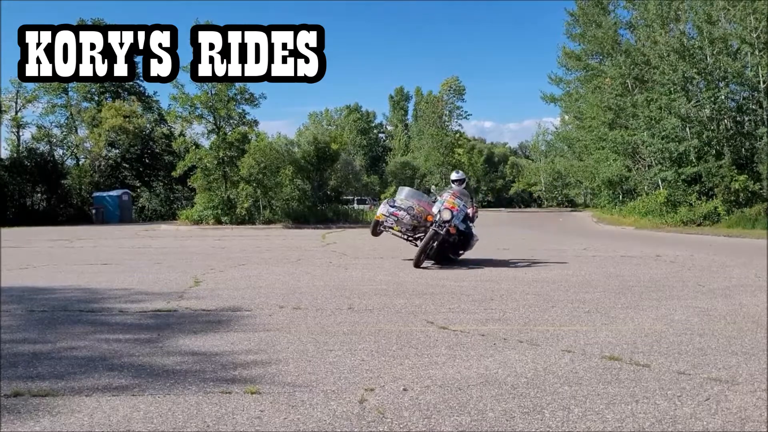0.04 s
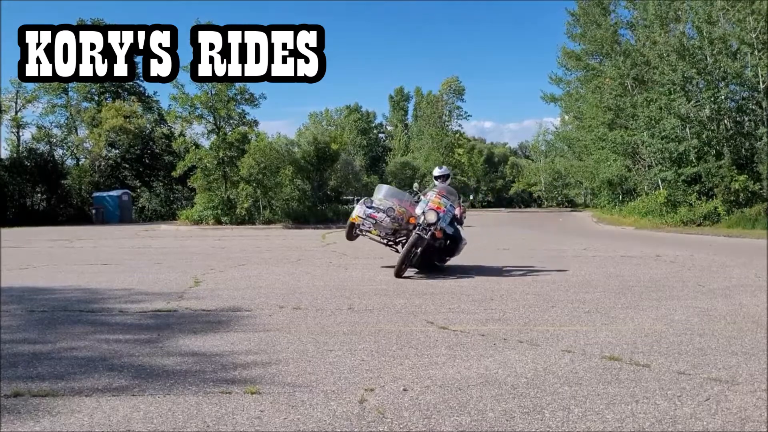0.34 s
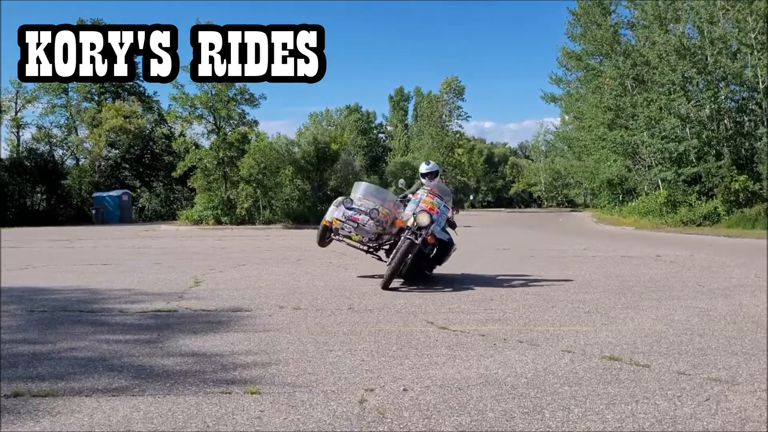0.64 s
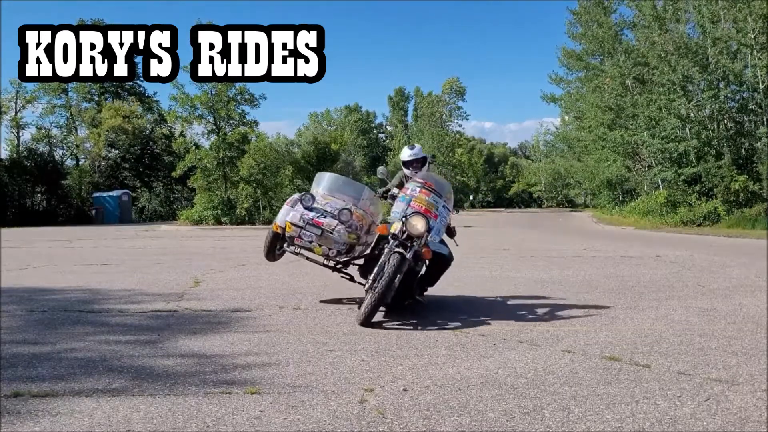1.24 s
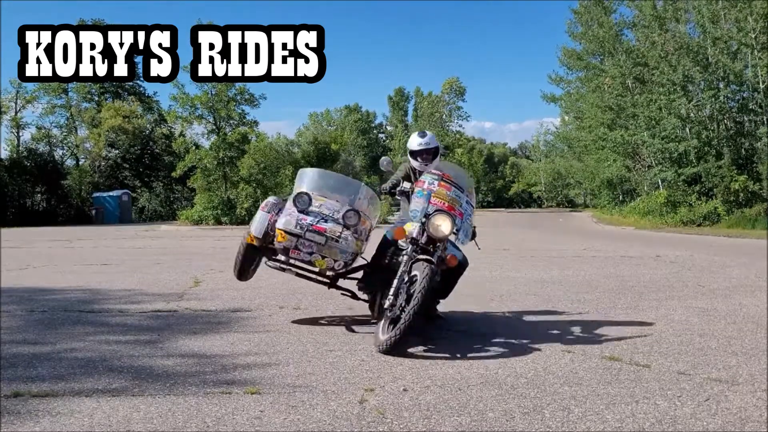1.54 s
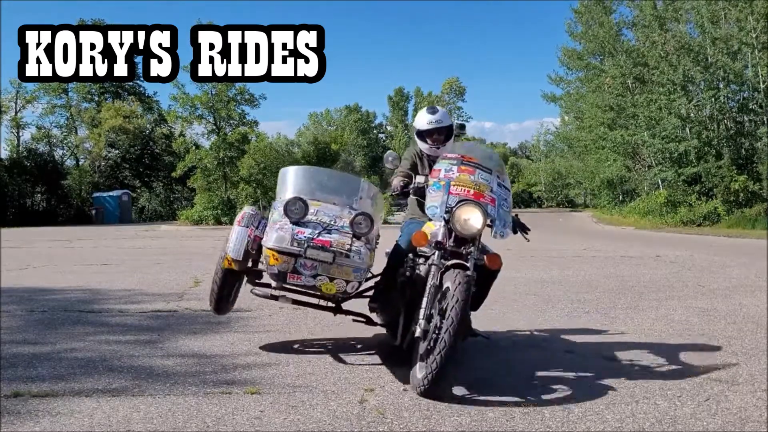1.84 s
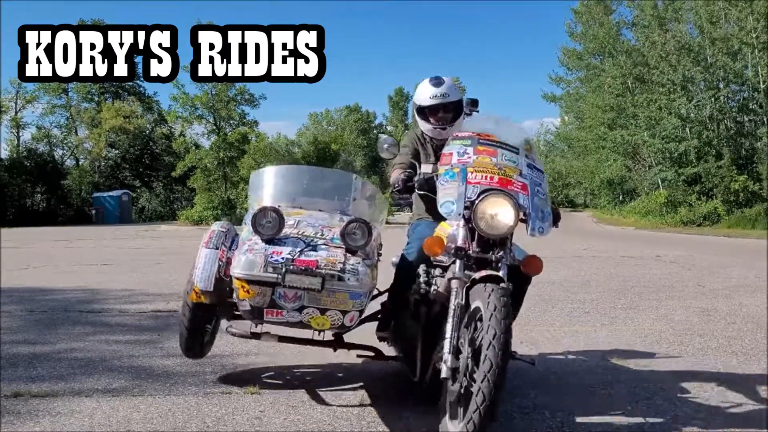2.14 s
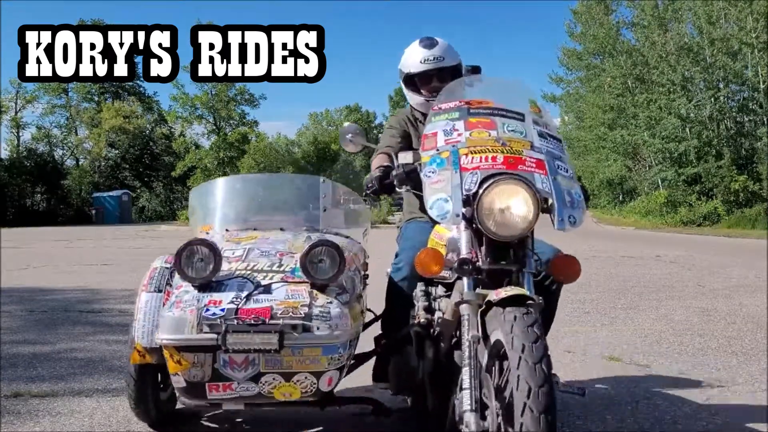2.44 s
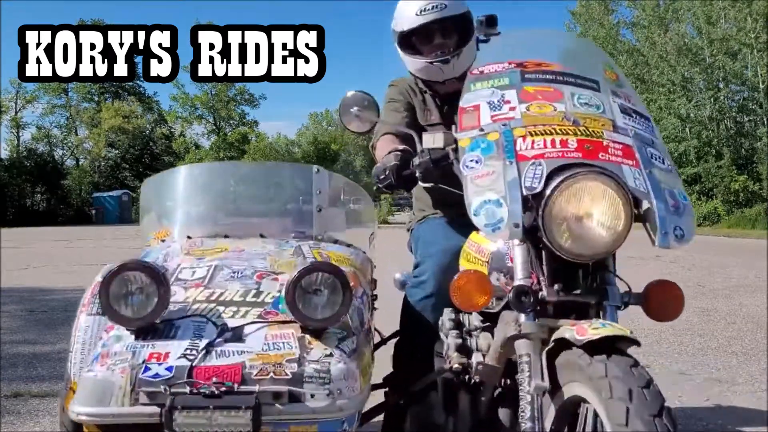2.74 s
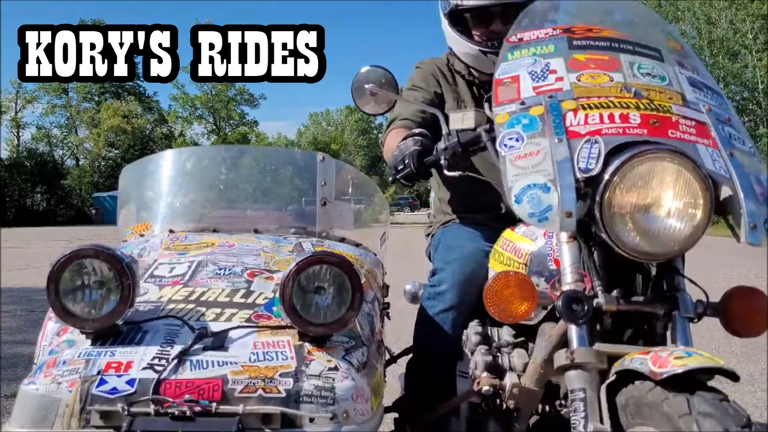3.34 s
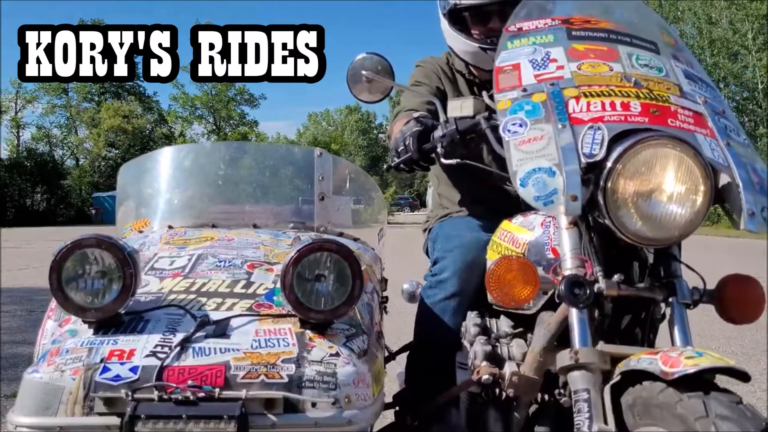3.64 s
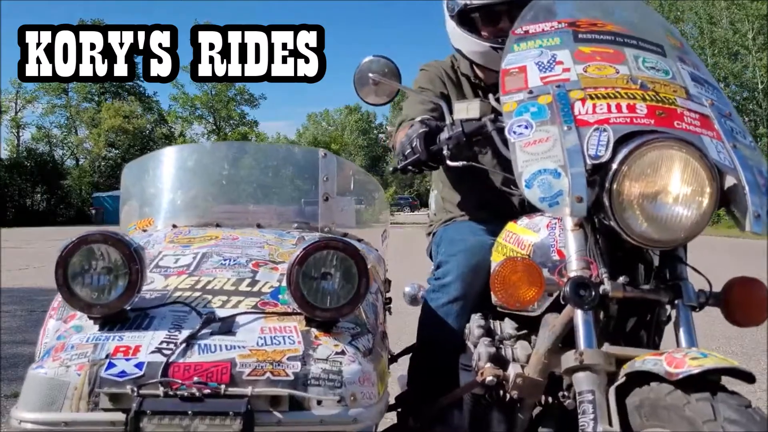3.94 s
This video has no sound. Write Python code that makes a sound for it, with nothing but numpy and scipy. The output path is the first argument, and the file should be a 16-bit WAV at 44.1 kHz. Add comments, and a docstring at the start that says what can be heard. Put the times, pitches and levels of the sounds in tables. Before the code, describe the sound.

A motorcycle with a sidecar rumbles up, briefly scraping asphalt, then settles into a thumping idle.

```python
"""A thumping motorcycle exhaust and a scrape of metal on asphalt: a bike with a sidecar leans, scrapes again,
slows across a paved lot and settles into a lumpy idle close by. One cylinder hits far harder than the
others; each firing bounces along the pipe and rings the silencer. Valves clatter between, gas puffs,
and chain, gears and tyres whirr. A tyre scuffs as the sidecar comes down, and the idle spits gas."""
import sys
import numpy as np
from scipy import signal
from scipy.fft import rfft, irfft
from scipy.io import wavfile

SR = 44100
rng = np.random.default_rng(int(sys.argv[2]) if len(sys.argv) > 2 else 0)


def persist_wave(psi):
    """Save psi, clipped to +-1, as 16-bit WAV."""
    counts = np.round(np.clip(psi, -1, 1) * 32767).astype(np.int16)
    wavfile.write(sys.argv[1], SR, np.atleast_2d(counts).T)


N = 176400

# four-stroke engine speed: time_s, cycles_per_s
ENGINE_SPEED = [(0.0, 20.638), (0.435, 21.229), (0.745, 17.817), (0.82, 22.021), (0.89, 19.996),
                (1.185, 16.175), (1.315, 18.177), (1.51, 16.559), (1.895, 14.033), (2.035, 14.464),
                (2.445, 11.634), (2.85, 10.71), (2.95, 10.882), (3.105, 10.021), (3.46, 10.005),
                (3.585, 10.455), (3.735, 9.566), (4.0, 10.364)]
# firings, strong one first: place_cycles, level_db, scatter_cycles, scatter_db
FIRING_PATTERN = [(0, 0, .001, .5), (.26, -21, .012, 1.5), (.5, -11.5, .014, 1.2), (.61, -15, .015, 2),
                  (.87, -20, .015, 2)]
# exhaust moves: time_s, relative_db, weak_lift_db, deep_bass_db, idle_share
EXHAUST_MOVES = [(0, -5, 7.5, -16, 0.21), (.48, -5, 9, -17, 0.16), (.58, -10.5, 10, -3, 0.37),
                 (.8, -7.5, 6.5, 1.5, 0.49), (1.1, -7, 9.5, 0, 0.32), (1.4, -3, 7.5, -6, .15),
                 (1.9, -3, 8, 0, 0.45), (2.45, 0.5, 3.5, 2.5, 0.47), (3, 1, 1.5, 5.5, 1),
                 (4, 0, 3.5, 9, 0.97)]
# silencer tone under load, at idle, and extra dulling of weak firings: pitch_hz, gain_db
LOAD_TONE = [(25, -2.5), (62, 43), (82, 24), (107, 35), (140, 18.5), (205, 35.5), (250, 35.5), (290, 24),
             (340, 30), (390, 36), (430, 23), (515, 21.5), (620, 9.5), (1000, 11), (1500, 7.5),
             (2500, -7.5), (8000, -45)]
IDLE_TONE = [(24, 23), (38, 19.5), (60, 15.5), (82, 27), (106, 39), (140, 30), (195, 34), (245, 29.5),
             (282, 36), (340, 31.5), (410, 25), (490, 17.5), (575, 24.5), (700, 11), (1000, 10.5),
             (1400, -4), (2500, -7.5), (8000, -18)]
WEAK_TONE = [(50, -2.5), (105, 2), (165, 7), (260, -0.5), (335, 5), (420, 2.5), (510, 0), (700, -6.5),
             (2000, -15.5)]
# tone of each noise layer: pitch_hz, gain_db
RUMBLE_TONE = [(20, -35), (42, -3), (60, 0), (95, -5), (165, 1), (215, -5), (280, -8), (370, -2), (450, -9),
               (620, -11), (900, -26), (3000, -50)]
VALVE_TONE = [(300, -36), (700, 8.5), (1100, 5), (1550, 1.5), (2100, -5.5), (2800, -8), (3600, -7),
              (6500, -7.5), (9000, -12), (16000, -21)]
PUFF_TONE = [(800, -9), (2500, -26), (6000, 0), (8800, -6), (11500, 1), (15500, 0)]
WHIRR_TONE = [(300, 17.5), (700, 9.5), (1500, -2), (3000, -6), (4600, -9.5), (6700, -9), (8800, -24.5),
              (12000, -19.5), (16000, -22.5)]
SCRAPE_TONE = [(300, -14), (900, -2), (1600, 0), (3000, -2), (4700, -3), (7500, -8), (9500, -17),
               (16000, -19)]
# lot reflections, fading as the bike nears: time_s, level_db
LOT_SEND = [(0, -10), (1.5, -12), (3, -19)]
# valve taps and gas puffs of one cycle: place_cycles, attack_s, decay_s, relative_db
VALVE_TAPS = [(.87, .003, .011, 0), (.985, .001, .012, -3), (.37, .003, .012, -.5), (.6, .004, .012, -9)]
GAS_PUFFS = [(.978, .001, .0035, 0), (.03, .002, .009, -10), (.5, .005, .016, -17)]
# machinery faders: time_s, valve_db, puff_db, whirr_db
FADERS = [(0, -52, -47, -31.5), (.45, -44.5, -96, -34.5), (.6, -53, -77, -38.5), (1.1, -51, -75, -36.5),
          (1.5, -50, -62, -35), (2.1, -48.5, -56, -35), (2.5, -45, -49, -33.5), (3, -40.5, -38.5, -34.5),
          (4, -39.5, -40, -35)]
# ring of the cylinder heads and the scraping metal: pitch_hz, width_hz, relative_db
HEAD_MODES = [(1130, 50, -14), (1560, 50, -10), (1880, 60, -11), (2330, 60, -14), (2820, 70, -13),
              (4600, 120, -16)]
METAL_MODES = [(1070, 18, -2), (1430, 40, -9), (1960, 50, -7), (2350, 40, -11), (2735, 35, -11),
               (3090, 60, -7.5), (4620, 150, -8)]
# metal on asphalt: peak_s, rise_s, fall_s, level_db, ring_db, pitch_ratio
SCRAPE_CUES = [(.036, 0.26, 0.028, -25, -0.5, 0.99), (0.903, 0.013, 0.018, -23, -7.5, .84)]
# tyre scuffs: peak_s, rise_s, fall_s, level_db, centre_hz
SCUFF_CUES = [(2.385, 0.048, 0.031, -47, 2240), (2.54, 0.019, 0.024, -37.5, 3570)]
# gas spits at idle: peak_s, level_db
SPIT_CUES = [(2.633, -34), (2.815, -32), (2.908, -28), (3.0, -30), (3.297, -26), (3.397, -29), (3.897, -27)]

FIRST_FIRING_CYCLES, SLACK_POWER = .492, .7
EXHAUST_DB, DEEP_BASS_HZ = -19.5, 88
ROUND_TRIP_MS = (4.8, 5.35)  # under load, at idle: hot gas shortens the trip
FIRST_ECHO_GAIN, NEXT_ECHO_RATIO, PIPE_CUTOFF_HZ = .9, .28, 2500
RUMBLE_DB, RUMBLE_DECAY_S = (-34, -26.5), .06  # level under load, at idle
BURST_SCATTER_DB, BURST_SCATTER_CYCLES = 1.8, .004
PORT_LAG_S, DIFFUSE_SHARE, DIFFUSE_ABOVE_HZ = .000075, .6, 2000


def undb(db):
    return 10 ** (np.asarray(db) / 20)


def unit(x):
    return x / np.sqrt(np.mean(x ** 2))


def curve(table, column, t):
    """One column of a table, ramped over time."""
    rows = np.array(table)
    return np.interp(t, rows[:, 0], rows.T[column])


def convolve(x, response):
    return signal.fftconvolve(np.atleast_2d(x), np.atleast_2d(response), axes=-1)[:, :N]


def colour(x, tone, size=8192):
    """Minimum-phase EQ through a tone table."""
    hz, db = np.array(tone).T
    f = np.maximum(np.fft.rfftfreq(size, 1 / SR), 1)
    cepstrum = irfft(np.log(undb(np.interp(np.log(f), np.log(hz), db))))
    cepstrum[1:size // 2] *= 2
    cepstrum[size // 2 + 1:] = 0
    return convolve(x, irfft(np.exp(rfft(cepstrum))))


def resonate(x, hz, width):
    return signal.lfilter(*signal.iirpeak(hz, hz / width, fs=SR), x)


def stereo(x):
    """Sound reaches the right side a moment before the left."""
    f = np.fft.rfftfreq(N, 1 / SR)
    return np.vstack([irfft(rfft(x) * np.exp(-2j * np.pi * f * PORT_LAG_S), N), x])


def noise():
    """Stereo noise, part direct and part diffuse, with the bass centred."""
    direct, mid, side = rng.standard_normal((3, N))
    side = signal.lfilter(*signal.butter(1, DIFFUSE_ABOVE_HZ, "high", fs=SR), side)
    diffuse = np.array([mid + side, mid - side])
    return np.sqrt(1 - DIFFUSE_SHARE) * stereo(direct) + np.sqrt(DIFFUSE_SHARE / 2) * diffuse


def grain(depth_db, size=44):
    """Millisecond flicker of a gritty sound."""
    return unit(undb(depth_db * np.repeat(rng.standard_normal(N // size + 1), size)[:N]))


def swell(t, peak, rise, fall):
    """A rise and fall around one peak."""
    return np.exp(-np.abs((t - peak) / np.where(t < peak, rise, fall)) ** 0.93)


def moments(cycles, t, place, scatter):
    """Times when the engine passes one place in its cycle; -1 outside the scene."""
    marks = np.arange(-1, int(cycles[-1]) + 1) + place
    marks = marks + scatter * rng.standard_normal(len(marks))
    return np.interp(marks, cycles, t, left=-1, right=-1)


def firings(cycles, t, idle):
    """The cylinders' beat, steady under load and loose at idle: times, sizes, which are strong."""
    starts, sizes = [], []
    for k, (place, db, scatter, scatter_db) in enumerate(FIRING_PATTERN):
        even, loose = moments(cycles, t, place, 0), moments(cycles, t, place, scatter)
        slack = np.interp(even, t, idle) ** SLACK_POWER
        at = even + slack * (loose - even)
        db = db + curve(EXHAUST_MOVES, 1, at) + (k > 0) * curve(EXHAUST_MOVES, 2, at)
        db += slack * scatter_db * rng.standard_normal(len(at))
        heard = np.minimum(even, loose) >= 0
        starts.append(at[heard])
        sizes.append(undb(db)[heard])
    at = np.concatenate(starts)
    return at, np.concatenate(sizes), np.arange(len(at)) < len(starts[0])


def exhaust(cycles, t, idle):
    """Each firing returns inverted and duller from the pipe's open end and rings the silencer."""
    at, size, strong = firings(cycles, t, idle)
    trip_s = np.interp(np.interp(at, t, idle), (0, 1), ROUND_TRIP_MS) / 1000
    pipe = np.zeros(N)
    for bounce in reversed(range(4)):
        gain = (-1) ** bounce * FIRST_ECHO_GAIN * NEXT_ECHO_RATIO ** (bounce - 1) if bounce else 1
        pipe = signal.lfilter(*signal.butter(1, PIPE_CUTOFF_HZ, fs=SR), pipe)
        arrives = ((at + bounce * trip_s) * SR).astype(int)
        hard, soft = (np.bincount(arrives, gain * size * which, N)[:N] for which in (strong, ~strong))
        pipe = pipe + hard + colour(soft, WEAK_TONE)[0]
    return undb(EXHAUST_DB) * unit((1 - idle) * colour(pipe, LOAD_TONE) + idle * colour(pipe, IDLE_TONE))


def rumble(cycles, t, idle):
    """Turbulent gas surges with the strong firing and dies away, loudest at idle."""
    age_s = cycles % 1 / curve(ENGINE_SPEED, 1, t)
    gas = colour(rng.standard_normal(N) * np.exp(-age_s / RUMBLE_DECAY_S), RUMBLE_TONE)
    return undb(np.interp(idle, (0, 1), RUMBLE_DB)) * unit(gas)


def lot_reflections(pipe, t, decay_s=.04):
    """The paved lot throws back a short tail of the exhaust."""
    tail = noise()[:, :SR // 2] * np.exp(-t[:SR // 2] / decay_s)
    return undb(curve(LOT_SEND, 1, t)) * convolve(pipe, tail / np.linalg.norm(tail[0]))


def bursts(cycles, t, pattern, tone):
    """Gritty noise that flares at set places in every engine cycle."""
    power, age = 0, t[:SR // 10]
    for place, attack, decay, db in pattern:
        at = moments(cycles, t, place, BURST_SCATTER_CYCLES)
        size = undb(db + BURST_SCATTER_DB * rng.standard_normal(len(at)))
        hits = np.bincount((at[at >= 0] * SR).astype(int), size[at >= 0] ** 2, N)[:N]
        shape = np.minimum(age / attack, 1) * np.exp(-np.maximum(age - attack, 0) / decay)
        power = power + convolve(hits, shape ** 2)
    return unit(colour(np.sqrt(np.abs(power)) * noise() * grain(depth_db=2.3), tone))


def valves(cycles, t):
    """Valves clatter and ring the cylinder heads."""
    taps = bursts(cycles, t, VALVE_TAPS, VALVE_TONE)
    heads = sum(undb(db) * unit(resonate(taps, hz, width)) for hz, width, db in HEAD_MODES)
    return undb(curve(FADERS, 1, t)) * (taps + heads)


def puffs(cycles, t):
    """Bright puffs of gas, hardest around the strong firing."""
    return undb(curve(FADERS, 2, t)) * bursts(cycles, t, GAS_PUFFS, PUFF_TONE)


def whirr(t, low_cut_hz=350):
    """Chain, gears and tyres blend into a bed of noise."""
    low_cut = signal.butter(2, low_cut_hz, "high", fs=SR, output="sos")
    return undb(curve(FADERS, 3, t)) * unit(signal.sosfilt(low_cut, colour(noise(), WHIRR_TONE)))


def metal_scrapes(t):
    """Metal grinds on the asphalt and rings."""
    grind = unit(colour(noise() * grain(depth_db=1.4), SCRAPE_TONE))
    scrapes = 0
    for at, rise, fall, level_db, ring_db, pitch in SCRAPE_CUES:
        ring = sum(undb(db) * unit(resonate(noise(), pitch * hz, width)) for hz, width, db in METAL_MODES)
        scrapes += undb(level_db) * swell(t, at, rise, fall) * (grind + undb(ring_db) * unit(ring))
    return scrapes


def tyre_scuffs(t):
    """Rubber drags over grit."""
    scuffs = 0
    for at, rise, fall, db, hz in SCUFF_CUES:
        rubber = unit(resonate(noise() * grain(depth_db=2.8), hz, hz / 2))
        scuffs += undb(db) * swell(t, at, rise, fall) * rubber
    return scuffs


def spits(t, rise_s=.00097, fall_s=.0035):
    """Sharp spits of gas accent the idle."""
    accents = sum(undb(db) * swell(t, at, rise_s, fall_s) for at, db in SPIT_CUES)
    return accents * unit(colour(noise(), PUFF_TONE))


def scene():
    """One engine clock drives the beat; the exhaust's deep bass rides its own fader."""
    t = np.arange(N) / SR
    cycles = np.cumsum(curve(ENGINE_SPEED, 1, t)) / SR - FIRST_FIRING_CYCLES
    idle = curve(EXHAUST_MOVES, 4, t)
    pipe = exhaust(cycles, t, idle) + rumble(cycles, t, idle)
    deep = signal.sosfiltfilt(signal.butter(6, DEEP_BASS_HZ, fs=SR, output="sos"), pipe)
    pipe += (undb(curve(EXHAUST_MOVES, 3, t)) - 1) * deep
    thump = stereo(pipe) + lot_reflections(pipe, t)
    machinery = valves(cycles, t) + puffs(cycles, t) + spits(t) + whirr(t)
    return thump + machinery + metal_scrapes(t) + tyre_scuffs(t)


def record(dry):
    """A steep cut takes off the air above 16 kHz."""
    return signal.sosfilt(signal.ellip(10, .2, 80, 16000, fs=SR, output="sos"), dry)


dry = scene()
out = record(dry)
persist_wave(out)
```